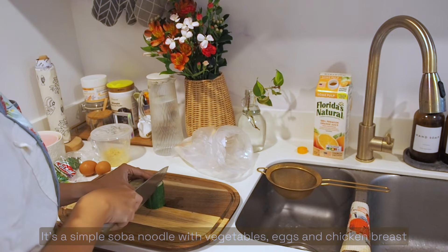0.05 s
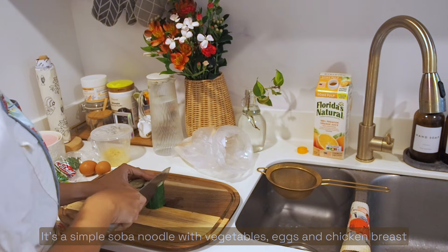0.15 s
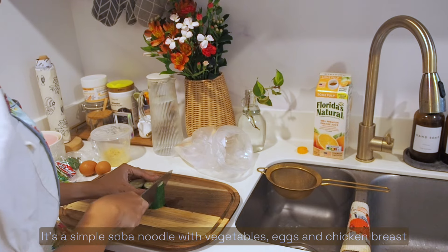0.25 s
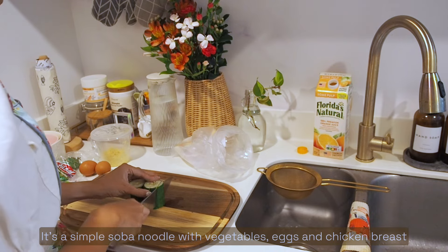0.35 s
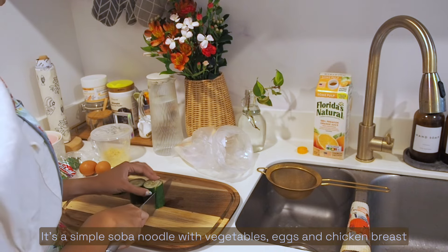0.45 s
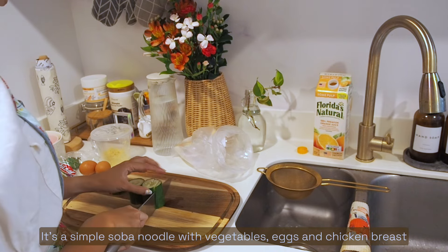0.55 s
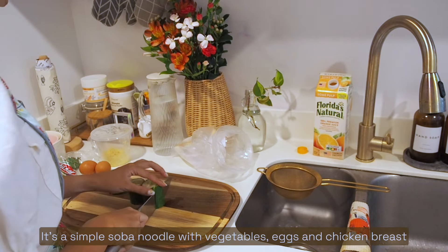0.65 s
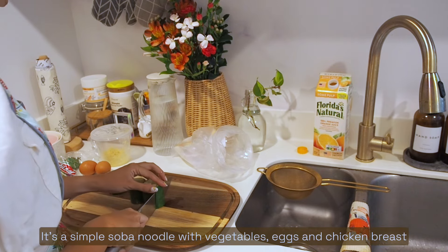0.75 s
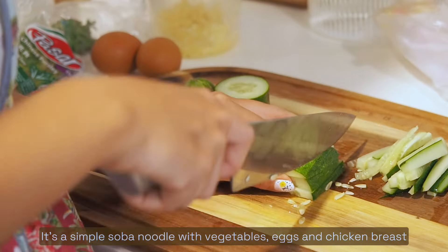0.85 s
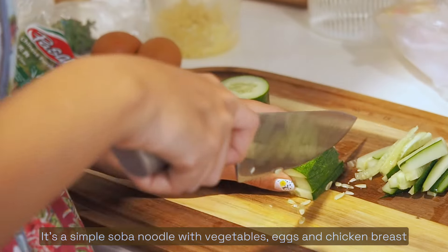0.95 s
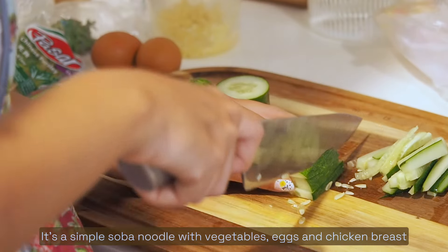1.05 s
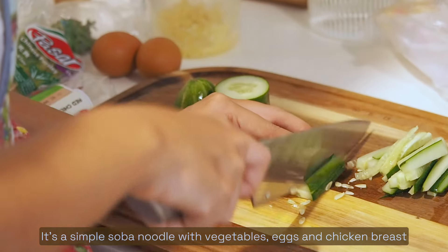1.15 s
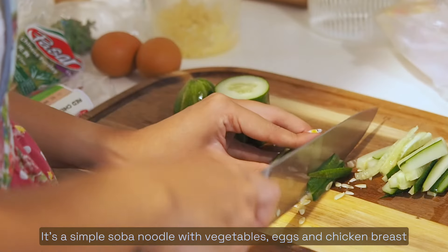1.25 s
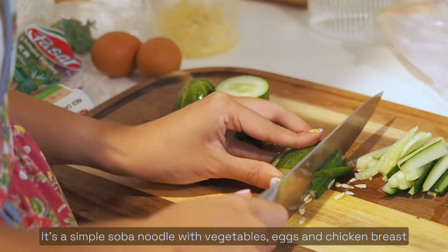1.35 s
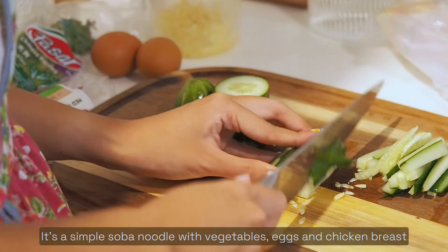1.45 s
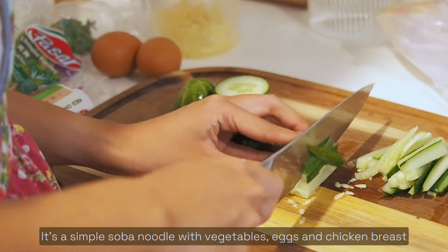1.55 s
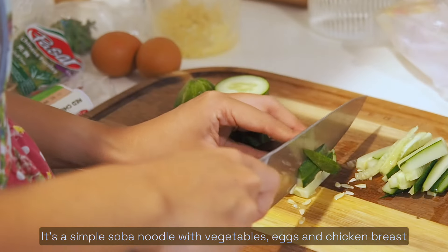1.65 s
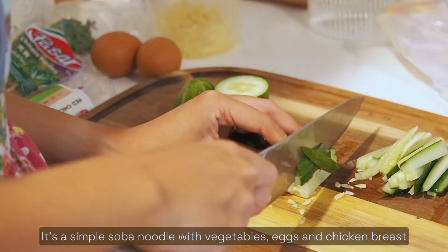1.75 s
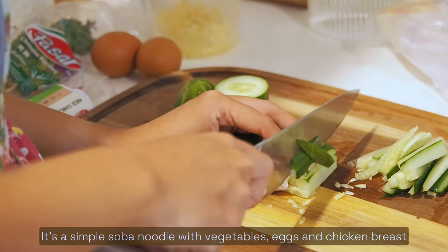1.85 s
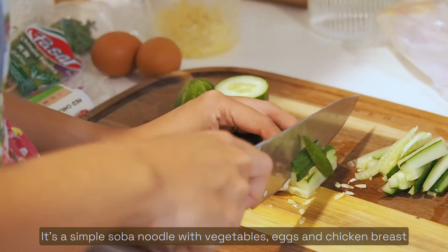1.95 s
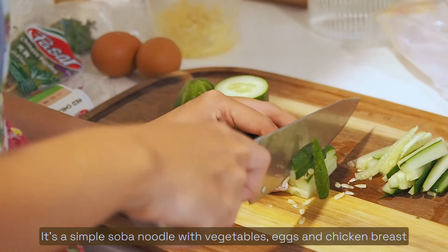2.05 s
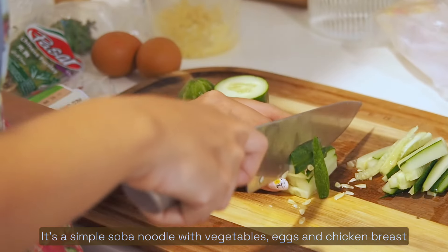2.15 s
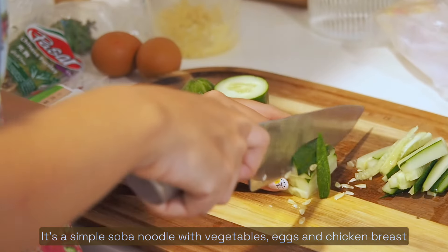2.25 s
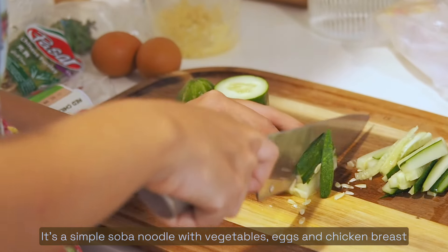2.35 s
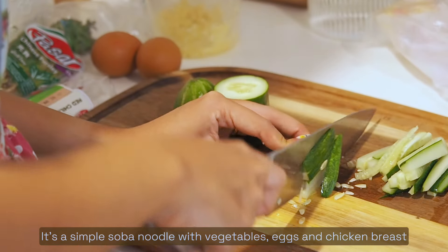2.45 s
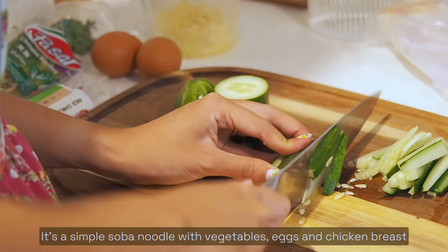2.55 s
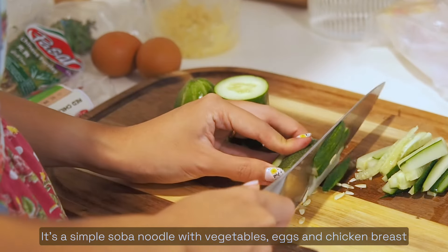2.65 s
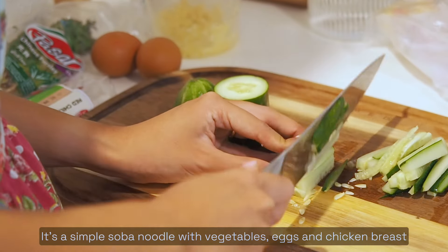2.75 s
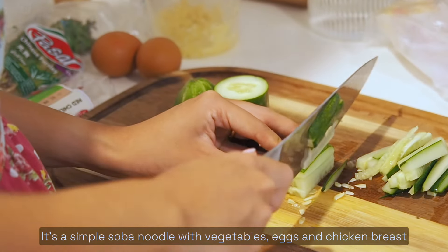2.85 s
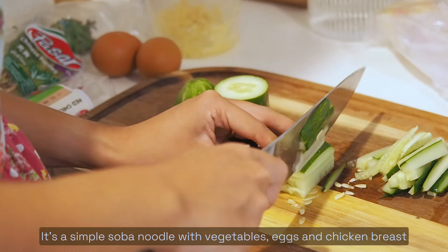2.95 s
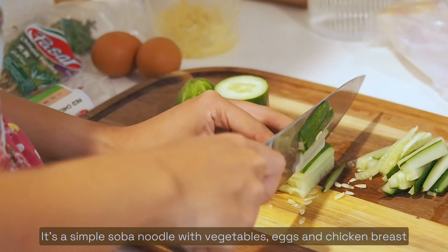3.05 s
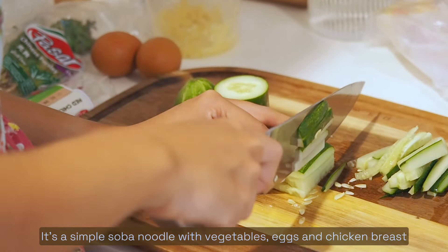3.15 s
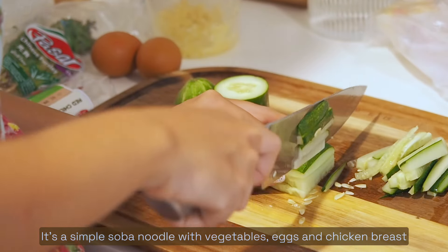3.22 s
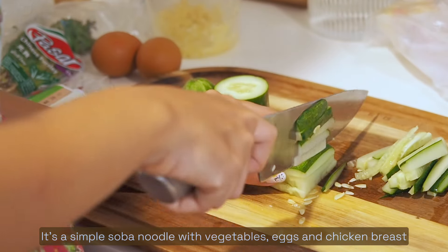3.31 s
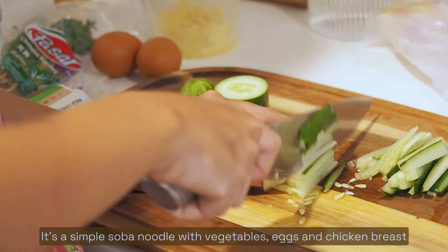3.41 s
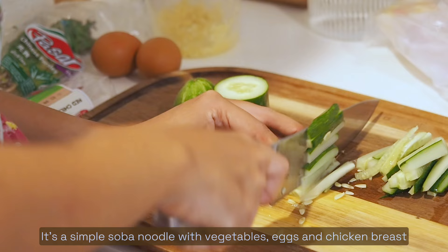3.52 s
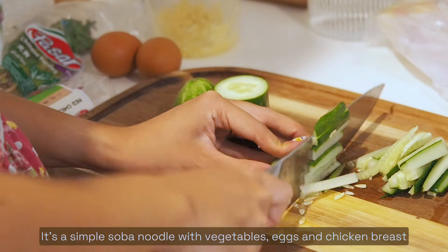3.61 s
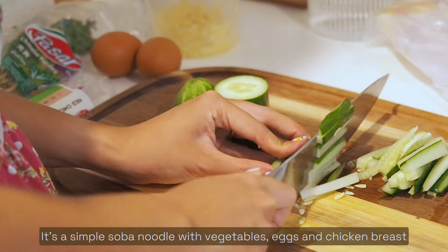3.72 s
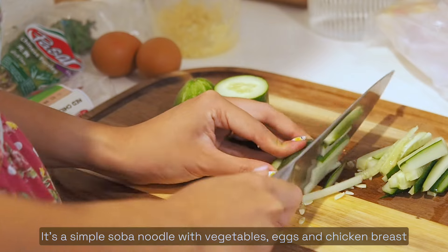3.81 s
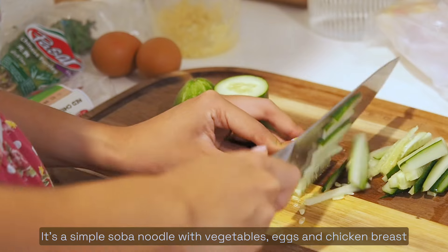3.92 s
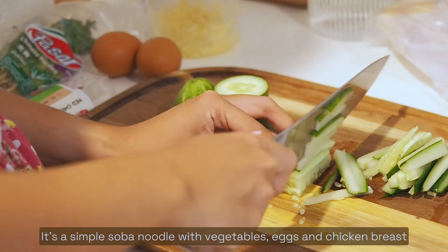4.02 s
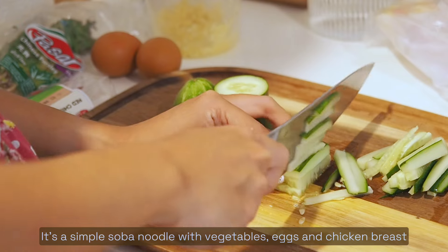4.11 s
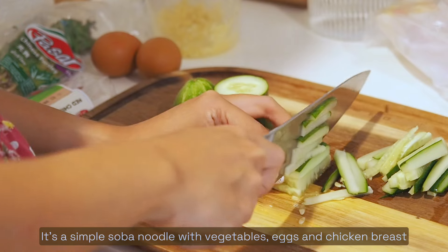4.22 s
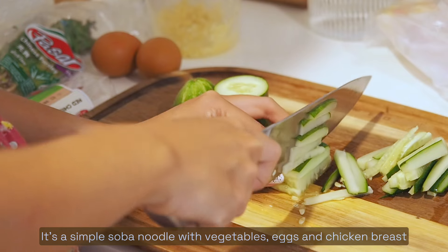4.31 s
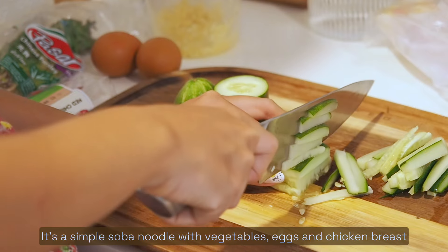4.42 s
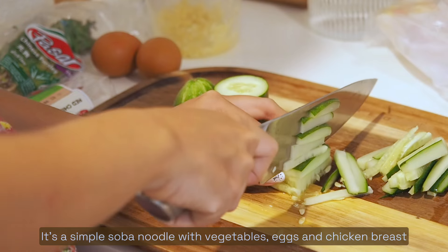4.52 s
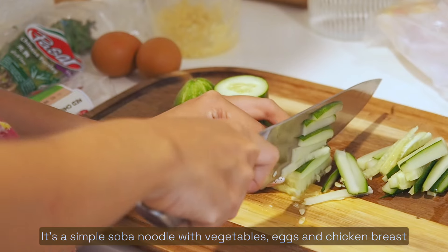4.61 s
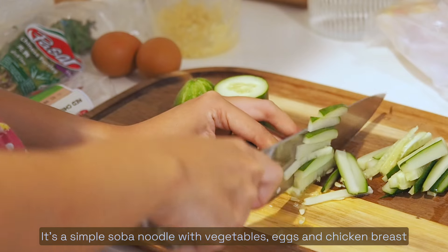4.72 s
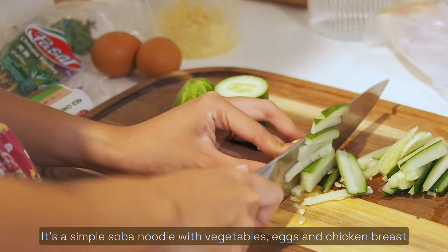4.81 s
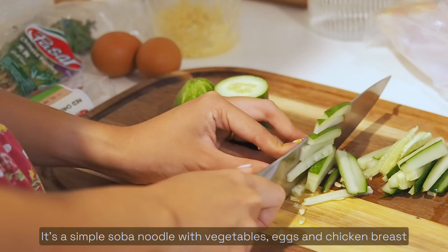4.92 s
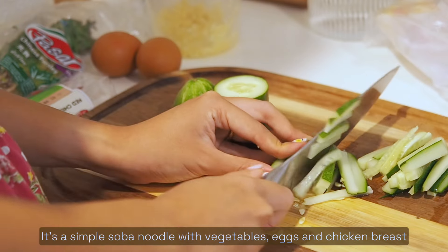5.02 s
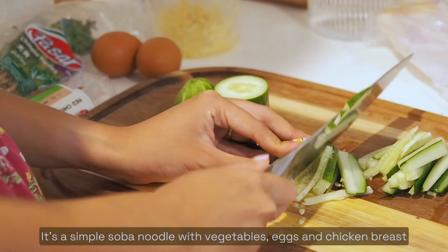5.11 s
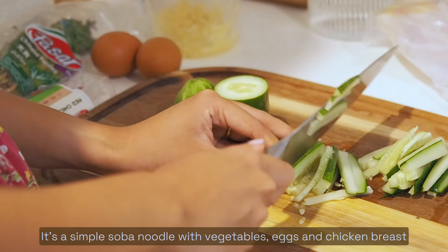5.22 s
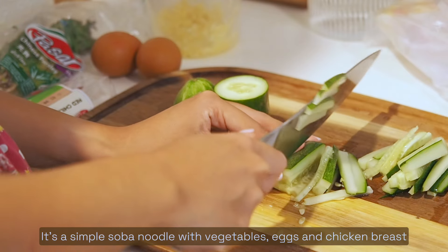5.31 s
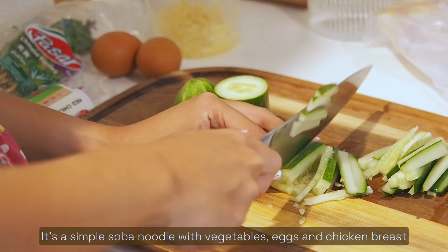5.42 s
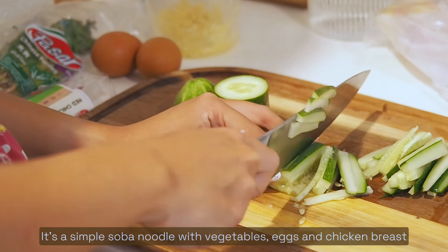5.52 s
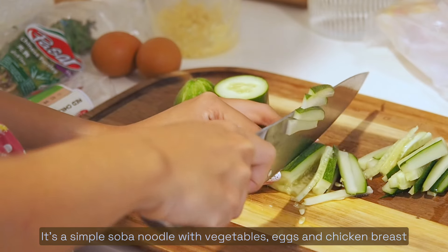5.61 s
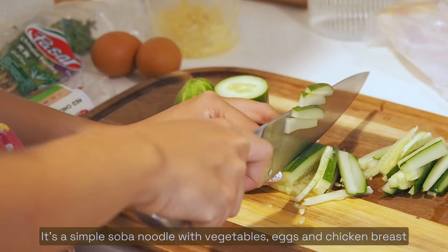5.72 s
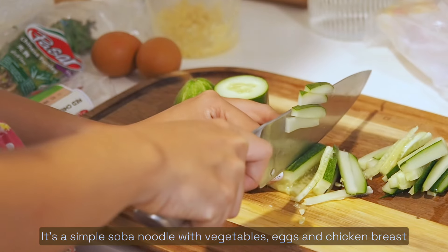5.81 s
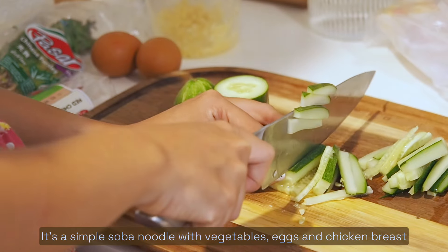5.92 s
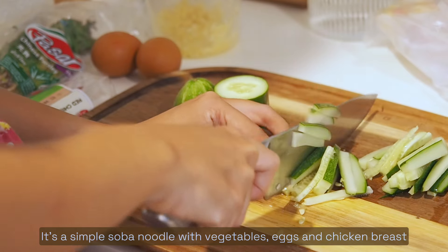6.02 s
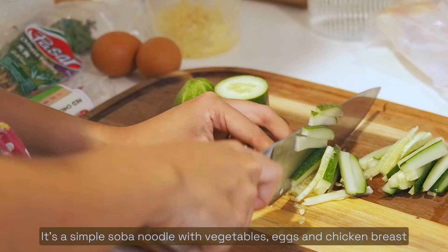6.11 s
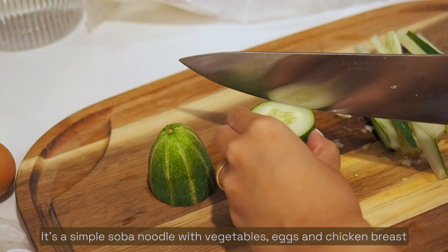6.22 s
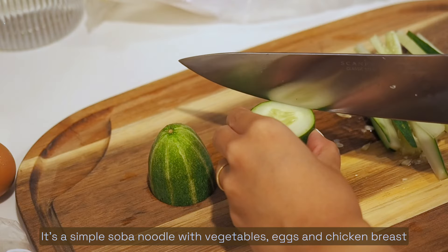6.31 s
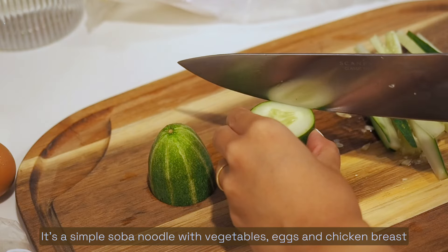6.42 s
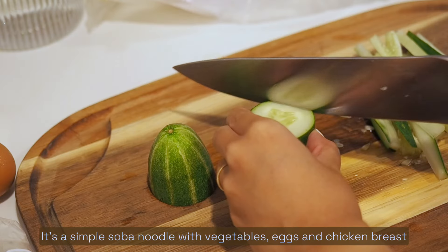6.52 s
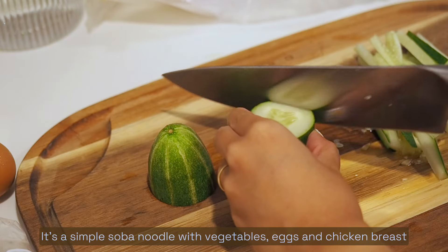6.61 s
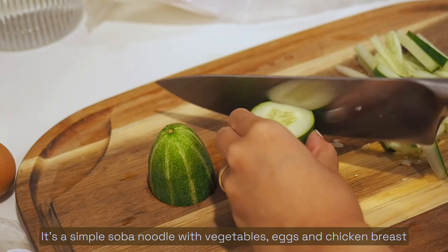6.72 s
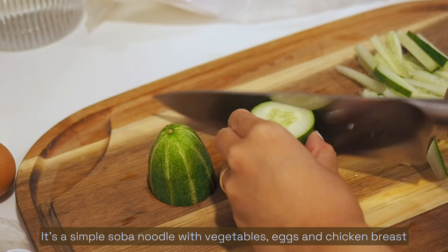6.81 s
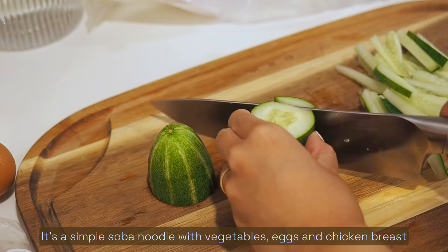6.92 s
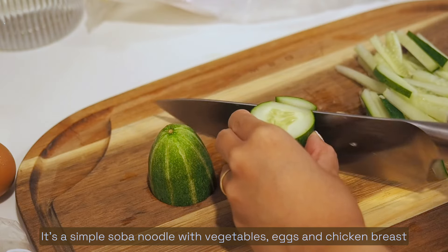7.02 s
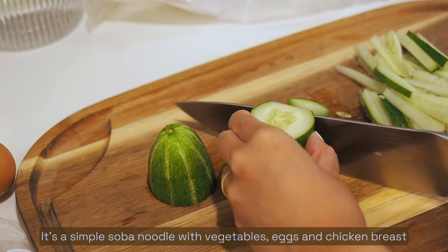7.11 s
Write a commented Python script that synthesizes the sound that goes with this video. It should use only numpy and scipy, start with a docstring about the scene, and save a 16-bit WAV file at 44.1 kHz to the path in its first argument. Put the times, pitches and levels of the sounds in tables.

```python
"""Close by, a gas ring hisses and whistles under a pot while a knife slides wetly through cucumber.
Turbulent gas is shaped noise with narrow humps; bursting cells are noise roughened by dense tiny grains.
Blade landings and one soft low tap strike a board: a pulse, decaying modes, wall echoes and a diffuse tail.
From 2.2 s on, skin snaps in short broad bursts; kitchen hum and a far flame lie under everything.
The scene has three passages, the near flame only in the first; the level dips briefly at each join."""
import sys
import numpy as np
from scipy import signal
from scipy.fft import rfft, irfft
from scipy.io import wavfile
from scipy.ndimage import uniform_filter1d

SR = 44100
rng = np.random.default_rng(int(sys.argv[2]) if len(sys.argv) > 2 else 0)


def to_wav(s):
    """Save 16-bit WAV."""
    ch = np.atleast_2d(s).T  # columns
    pcm = np.round(np.clip(ch, -1, 1) * 32767)  # PCM
    wavfile.write(sys.argv[1], SR, pcm.astype(np.int16))


N = 315756

# Joins between passages: t/s
JOINS_S = [0.885, 6.185]
FADE_OUT_S, FADE_IN_S = .013, .007

# Gas ring close by, relative density: f/Hz, level per Hz/dB
NEAR_GAS = [(150, -39), (250, -8), (273, -33), (303, -15), (386, -22), (637, -15.5), (1130, -7),
            (1410, -1.5), (1630, -6.5), (3250, -1), (8010, -16), (10200, -15.5), (15700, -18.5)]
# Its whistles: f/Hz, width/Hz, level over the hiss/dB
NEAR_WHISTLES = [(880, 180, 8.5), (1457, 39, 14), (2574, 44, 11.5), (3180, 35, 7), (3450, 63, 7.5),
                 (3900, 40, 8.5), (7770, 910, 13)]
# Its course: t/s, level/dB
NEAR_LEVEL = [(0.0, -36), (0.302, -34), (0.446, -37.5), (0.718, -37), (0.838, -35)]
# Kitchen air and far flame, relative density: f/Hz, level per Hz/dB
FAR_GAS = [(12, -35), (20, -2.5), (22, -73), (42, -1), (240, -3), (335, -17), (419, -7.5), (994, -8.5),
           (2790, -19), (4740, -20.5), (6630, -24.5), (9260, -19), (10400, -37), (12200, -18.5),
           (15700, -33.5)]
# Their narrow tones: f/Hz, width/Hz, level over the hiss/dB
FAR_WHISTLES = [(170, 5.9, -3), (208, 2.8, 11.5), (315.6, 13.8, 12.5), (710.7, 4.3, 13.5), (1005, 12, 5),
                (1418, 74, 8.5), (1750, 85, 8.5), (3580, 9, 13), (4810, 19, 14.5), (8130, 230, 3),
                (9500, 290, 9), (12200, 500, -7)]
# Their course: t/s, level/dB, extra rumble below the knee/dB
FAR_LEVEL = [(0.0, -42, 2.5), (0.44, -39, -5), (0.9, -42, 0.5), (2.6, -42.5, 2), (4.3, -43, 0.3),
             (6.1, -43, 1.5), (6.5, -45, 7), (7.16, -43, 1.5)]
RUMBLE_KNEE_HZ = 260
# Left-right correlation of the air sounds: f/Hz, correlation/1
AIR_CORRELATION = [(60, 0.9), (150, 0.92), (380, 0.85), (950, 0.75), (2380, -0.039), (5980, -0.14),
                   (15000, -0.1)]

# Slides of the blade, cutting down or drawing back:
# start t/s, end t/s, start level/dB, end level/dB, low squelch relative to the swish/dB
STROKES = [(0.0, 0.412, -46, -40, -1.5), (1.018, 1.16, -45.5, -39, -3.5), (1.2, 1.267, -47, -45.5, -4),
           (2.239, 2.388, -41.5, -42, -6.5), (2.418, 2.54, -49, -48, -3), (3.375, 3.44, -40, -33.5, -5.5),
           (3.525, 3.575, -43.5, -42.5, -16), (4.47, 4.68, -54, -38, 1.5), (5.207, 5.212, -51, -52, -5),
           (5.984, 6.008, -41.5, -33.5, 2), (6.462, 6.852, -46, -34, -5.5),
           (7.036, 7.164, -47.5, -49, -4.5)]
# Relative density of the wet swish: f/Hz, level per Hz/dB
SWISH = [(3000, 2), (5000, -2.5), (7000, 0), (9000, 3), (12000, 0.5), (14000, -1), (16000, -9)]
# Relative density of the low squelch: f/Hz, level per Hz/dB
SQUELCH = [(600, -6), (1200, -9), (2200, -4.5), (3500, 4.5), (5000, 3.5), (6500, 2), (9000, -65.5)]
# Left-right correlation of the blade sounds: f/Hz, correlation/1
BLADE_CORRELATION = [(500, 0.98), (3000, 0.22), (7000, 0.27), (15000, 0.17)]
# Swell before the start, decay after the end, exponent of the late rush
BITE_DB_PER_S, DIE_DB_PER_S, SPEEDUP_POWER = 450, 162, 2.56

# Blows on the board: blade landings, and a soft low tap of heel or handle at 2.587 s.
# Levels before the midrange gain: t/s, knock level/dB, contact f/Hz, counter thud level/dB,
# ring level/dB, lowest mode group level/dB, softness/1 (0 bare edge, 1 cushioned by slices),
# gain at MIDRANGE_HZ/dB: a dip or lift near 1.6 kHz, set for each blow
BLOWS = [(0.4287, -17, 680, -25.5, -19.5, -25.5, 1.46, 7.5), (1.17, -10, 600, -26, -21.5, -28, .9, -20),
         (2.38, -13, 573, -29, -24, -30, 0.84, -18), (2.5870, -27.5, 724, -20, -43, -33, 0.59, 6),
         (3.4782, -23, 474, -22, -27.5, -35, 1.6, -12), (4.6885, -0.6, 1040, -15, -15, -27, 0.37, 0),
         (6.0098, 3.5, 1260, -14.5, -13.5, -26.5, 0.05, -2), (6.8716, -15.5, 520, -28, -27, -27, 1.5, -1.5)]
# Modes of board and worktop, relative within a group: f/Hz, level/dB, T60/s
BOARD = [(315.5, -7, 0.64), (351.5, -1.5, 0.47), (407, 12.5, 0.16), (482.8, 3, 0.38), (525.4, 11, 0.16),
         (572, 10.5, 0.23), (624, 4.5, 0.4), (701, 1, 0.33), (787, 4, 0.095), (833.5, 7.5, 0.077),
         (900, -20, 0.26), (890.5, 8.5, 0.18), (972, 10.5, 0.13), (1015, -20, 0.067), (1139, -0.5, 0.44),
         (1188, -25, 0.43), (1220, -8, 0.12), (1297, -3, 0.18), (1610, -22, 0.13), (1696, -5.5, 0.48),
         (1824, -1.5, 0.25), (1963, -20, .2), (2100, -7, .2), (2360, 4, 0.22), (2540, 2, 0.073),
         (2810, -3, 0.12), (3170, -11, .3), (3180, -6, .28), (3630, -27, 0.16)]
# Low cabinet modes, relative: f/Hz, level/dB, T60/s
COUNTER = [(125.5, -19.5, 0.37), (189.6, -8.5, 0.37), (227.4, -14.5, 0.53)]
# Near walls: delay t/s, level/dB, pan/dB (added on the left, taken off on the right)
ECHOES = [(.0024, -6, 0), (.0060, -11, 3), (.0072, -5, -2), (0.023, -6.5, -4.5)]
# Diffuse tail of the room, relative: f/Hz, level/dB, T60/s
TAIL = [(255, 12, 0.2), (543, 13, 0.38), (1230, 8, 0.3), (1780, 3, 0.3), (2530, -5, 0.42), (3400, -4, 0.4),
        (5000, -7, 0.18), (6900, -3, 0.23)]
# Left-right correlation of the tail: f/Hz, correlation/1
TAIL_CORRELATION = [(60, 0.96), (180, 0.99), (550, 0.89), (1650, 0.61), (4970, 0.05), (15000, 0.23)]
# Lowest mode group: low f/Hz, high f/Hz
LOWEST_GROUP_HZ = (290, 460)
# Other mode groups: low f/Hz, high f/Hz
GROUP_HZ = [(460, 760), (760, 1300), (1300, 1900), (1900, 2800), (2800, 3650), (4050, 5500)]
# For each of these: level under a bare edge/dB, change per unit softness/dB
GROUP_DB = [(-3, 3.5), (-1.05, 0.4), (-7, -2.1), (-6, -4.5), (-8, -12), (-11.5, -15.5)]
MIDRANGE_HZ, MIDRANGE_WIDTH_HZ = 1560, 580
MODE_SCATTER_DB = 3   # each blow drives each mode a little differently
CRACK_DB = -23   # the crack, relative to the knock

# Skin snaps: t/s, level/dB
SNAPS = [(2.236, -39), (3.3526, -39), (4.466, -36.5), (4.5367, -30), (4.588, -36), (4.6598, -35),
         (5.2136, -40), (5.866, -38), (5.9767, -30), (6.4503, -42)]
SNAP_LOW_HZ, SNAP_HIGH_HZ, SNAP_T60_S = 2200, 9600, 0.051

# Dips of the microphone housing: f/Hz, width/Hz, depth/dB
MIC_NOTCHES = [(6520, 620, 27), (10310, 1930, 38)]
BALANCE_DB, OFFSET = .5, -0.0026   # left over right; constant added to the waveform
CUTOFF_HZ = 15850


def from_db(db):
    """Decibel law: level to amplitude gain."""
    return 10 ** (np.asarray(db) / 20)


def rms_one(x):
    """Energy normalisation: scale to rms 1."""
    return x / np.sqrt(np.mean(x ** 2) + 1e-20)


def in_time(rows):
    """Linear interpolation: the columns of a curve at every sample."""
    s, *columns = np.transpose(rows)
    return [np.interp(np.arange(N) / SR, s, column) for column in columns]


def at_hz(points, hz, column=1):
    """Logarithmic frequency scale: interpolate a table column along it."""
    points = np.array(points)
    return np.interp(np.log(np.maximum(hz, 1)), np.log(points[:, 0]), points[:, column])


def band(x, low_hz, high_hz, order=2):
    """Causal band-pass filtering: the response never precedes its cause."""
    sos = signal.butter(order, [low_hz, high_hz], "band", fs=SR, output="sos")
    return signal.sosfilt(sos, x)


def coloured(spectrum, correlation, whistles=(), size=N):
    """Spectral shaping of noise, with narrow humps and mid/side mixing for correlation; rms 1."""
    hz = np.fft.rfftfreq(size, 1 / SR)
    gain = from_db(at_hz(spectrum, hz))
    for centre_hz, width_hz, db in whistles:
        hump_db = db / (1 + (2 * (hz - centre_hz) / width_hz) ** 2)
        gain = gain * from_db(hump_db)
    alike = np.clip(at_hz(correlation, hz), -.99, .99)
    white = rfft(rng.standard_normal((2, size)))
    mid, side = white * gain * np.sqrt([1 + alike, 1 - alike])
    return rms_one(irfft(np.array([mid + side, mid - side]), size))


def drift(rate):
    """Slow random modulation: points of spread 1, `rate` per second, joined by straight lines."""
    points = rng.standard_normal(400)
    return np.interp(np.arange(N) / SR * rate, np.arange(400), points)


def passage_end(s):
    """Partition of time: the end of the passage that holds the moment s."""
    return min(end for end in JOINS_S + [N / SR] if end > s)


def stove(waver_db=1.7):
    """Turbulent jet noise: the near flame in the first passage, hum and far flame throughout."""
    near_db, = in_time(NEAR_LEVEL)
    first_passage = np.arange(N) / SR < JOINS_S[0]
    near = first_passage * from_db(near_db) * coloured(NEAR_GAS, AIR_CORRELATION, NEAR_WHISTLES)
    far_db, rumble_db = in_time(FAR_LEVEL)
    far = coloured(FAR_GAS, AIR_CORRELATION, FAR_WHISTLES)
    low = signal.sosfiltfilt(signal.butter(2, RUMBLE_KNEE_HZ, fs=SR, output="sos"), far)
    rumble = from_db(rumble_db + waver_db * drift(9.8)) * low
    return near + from_db(far_db) * (far - low + rumble)


def stroke_db(start_s, end_s, start_db, end_db):
    """Level of sliding contact: quick bite, late rush, then decay; cut off with its passage."""
    t = np.arange(N) / SR
    way = np.clip((t - start_s) / max(end_s - start_s, 1e-3), 0, 1)
    db = start_db + (end_db - start_db) * way ** SPEEDUP_POWER
    db = db - BITE_DB_PER_S * np.maximum(start_s - t, 0)
    db = db - DIE_DB_PER_S * np.maximum(t - end_s, 0)
    return np.where(t < passage_end(start_s), db, -200)


def slicing(grains_per_s=6000, grain_db=-2.5, grain_share=0.36, flicker_db=-0.2):
    """Granular noise: cells burst along the edge, so dense tiny grains roughen a smooth swish."""
    swish_gain, squelch_gain = 0, 0
    for *slide, squelch_db in STROKES:
        level_db = stroke_db(*slide)
        swish_gain = np.maximum(swish_gain, from_db(level_db))
        squelch_gain = np.maximum(squelch_gain, from_db(level_db + squelch_db))
    born = rng.random(N) < grains_per_s / SR
    grain_gain = from_db(grain_db * rng.exponential(1, N))
    grains = uniform_filter1d(born * grain_gain, size=24)   # each grain lasts 24 samples
    rough = rms_one(1 + grain_share * rms_one(grains)) * from_db(flicker_db * drift(27))
    swish = swish_gain * coloured(SWISH, BLADE_CORRELATION)
    squelch = squelch_gain * coloured(SQUELCH, BLADE_CORRELATION)
    return rough * (swish + squelch)


def ring(force, modes):
    """Modal superposition: one force rings every mode; groups of four neighbours alternate in sign."""
    out = 0
    for k, (hz, db, t60) in enumerate(modes):
        r, w = from_db(-60 / (t60 * SR)), 2 * np.pi * hz / SR   # pole radius and angle
        mode = signal.lfilter([0, np.sin(w)], [1, -2 * r * np.cos(w), r * r], force + 1e-18)
        out = out + (-1) ** (k // 4) * from_db(db) * mode
    return out


def room_tail(size=15000, build_s=0.00022):
    """Diffuse reverberation: stereo noise that builds up and dies exponentially, band by band."""
    t, out = np.arange(size) / SR, 0
    for hz in 250 * 2 ** np.arange(0, 5.5, .5):   # half-octave steps
        white = coloured([(20, 0), (20000, 0)], TAIL_CORRELATION, size=size)
        noise = band(white, hz / 1.19, hz * 1.19)
        decay_db = -60 * t / at_hz(TAIL, hz, column=2)
        out = out + noise * from_db(at_hz(TAIL, hz) + decay_db)
    return out * (1 - np.exp(-t / build_s))


def blows(board_db=-43, tail_db=-26, contact_span=3.04, crack_s=0.0029, first_passage_db_per_s=60):
    """Impact excitation: board, counter, walls and room answer; softness weights the mode groups."""
    size = 15000
    t = np.arange(size) / SR
    click = np.eye(1, size)[0]
    knock = np.array([click, click]) + 1e-18
    for s, db, pan_db in ECHOES:   # first echoes, inverted
        knock[:, round(s * SR)] -= from_db(db + pan_db * np.array([1, -1]))
    tail = from_db(tail_db) * room_tail()
    scatter = rng.standard_normal((len(BLOWS), len(BOARD)))
    midrange = signal.iirpeak(MIDRANGE_HZ, MIDRANGE_HZ / MIDRANGE_WIDTH_HZ, SR)
    thud = band(ring(click, COUNTER), 54, 208)   # the heavy cabinet is slow to start
    cracks = coloured(SWISH, BLADE_CORRELATION, size=size) * np.exp(-t / crack_s)
    out = np.zeros((2, N + size))
    for blow, chances in zip(BLOWS, scatter):
        s, blow_db, contact_hz, thud_db, ring_db, lowest_db, softness, midrange_db = blow
        # a lower contact frequency gives a longer, duller pulse
        top_hz = contact_hz * contact_span
        direct = band(knock, contact_hz / 2, top_hz, order=1)
        direct = band(direct, 130, top_hz, order=3)
        direct = direct / np.max(direct[:, :90])
        sound = from_db(blow_db) * (direct + from_db(CRACK_DB) * cracks)
        sound = sound + from_db(thud_db) * thud

        struck = [(hz, db + MODE_SCATTER_DB * chance, t60)
                  for (hz, db, t60), chance in zip(BOARD, chances)]
        ringing = from_db(board_db) * ring(click, struck) + tail
        group_db = [lowest_db] + [ring_db + bare_db + softness * change_db
                                  for bare_db, change_db in GROUP_DB]
        for db, (low_hz, high_hz) in zip(group_db, [LOWEST_GROUP_HZ] + GROUP_HZ):
            group = band(ringing, low_hz, high_hz, order=3)
            group = group / np.sqrt(np.mean(group[:, :1300] ** 2))   # rms 1 over the first 30 ms
            sound = sound + from_db(db) * group

        sound = sound + (from_db(midrange_db) - 1) * signal.lfilter(*midrange, sound)
        if s < JOINS_S[0]:   # in the first passage the board's ringing dies away faster
            sound = sound * from_db(-first_passage_db_per_s * t)
        start, stop = round(s * SR), round(passage_end(s) * SR)
        # the ringing ends with its passage
        out[:, start:min(stop, start + size)] += sound[:, :stop - start]
    return out[:, :N]


def snaps():
    """Sudden release of strain: skin gives way under the edge in short broad bursts."""
    size = 2000
    out, t = np.zeros((2, N)), np.arange(size) / SR
    for (s, db), noise in zip(SNAPS, rng.standard_normal((len(SNAPS), 2, size))):
        shared = noise + noise[0]   # the left noise is heard in both channels
        burst = band(shared, SNAP_LOW_HZ, SNAP_HIGH_HZ, order=1) / 2
        start = round(s * SR)
        out[:, start:start + size] += burst * from_db(db - 60 * t / SNAP_T60_S)
    return out


def scene():
    """Linear superposition of all sources, with a short dip in level at each join."""
    t, fade = np.arange(N) / SR, np.ones(N)
    for join in JOINS_S:
        fade *= np.interp(t, [join - FADE_OUT_S, join, join + FADE_IN_S], [1, .25, 1])
    return fade * (stove() + slicing() + blows() + snaps())


def record(dry):
    """Transducer response: housing notches, balance, hard ceiling, steep top cut, small offset."""
    for hz, width_hz, depth_db in MIC_NOTCHES:
        b, a = signal.iirnotch(hz, hz / width_hz, SR)
        notched = signal.lfilter(b, a, dry)
        dry = dry + (1 - from_db(-depth_db)) * (notched - dry)
    balance = from_db([[BALANCE_DB / 2], [-BALANCE_DB / 2]])
    wet = np.clip(dry * balance, -1, 1)
    top_cut = signal.ellip(12, .3, 70, CUTOFF_HZ, fs=SR, output="sos")
    return signal.sosfilt(top_cut, wet) + OFFSET


dry = scene()
out = record(dry)
to_wav(out)
```